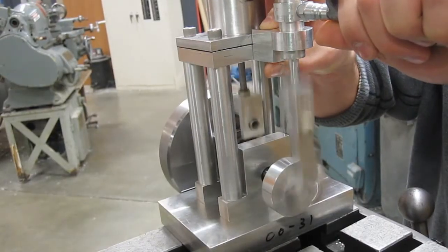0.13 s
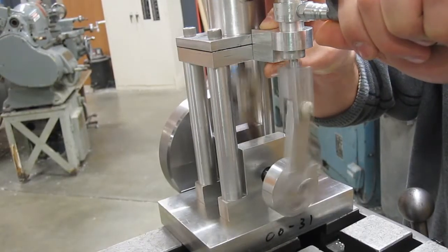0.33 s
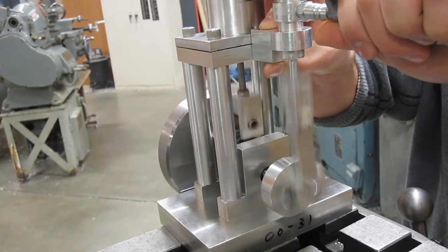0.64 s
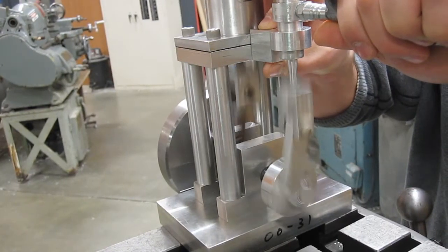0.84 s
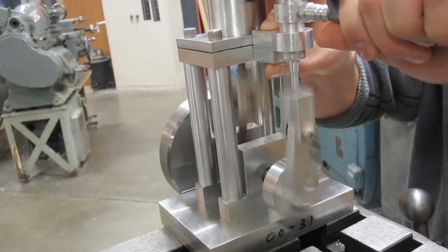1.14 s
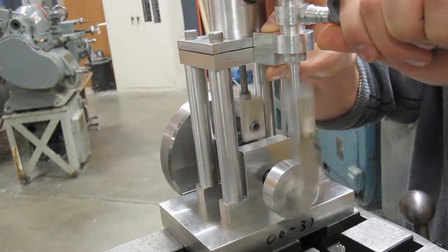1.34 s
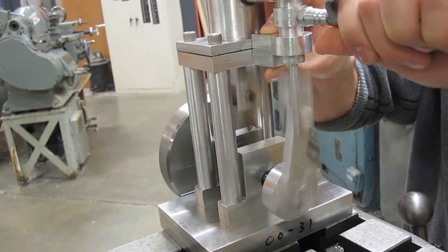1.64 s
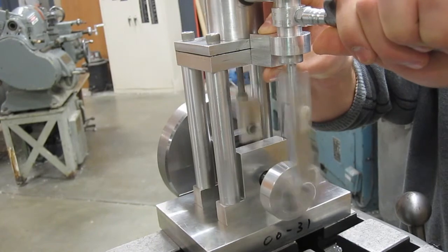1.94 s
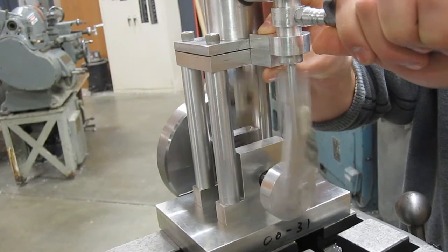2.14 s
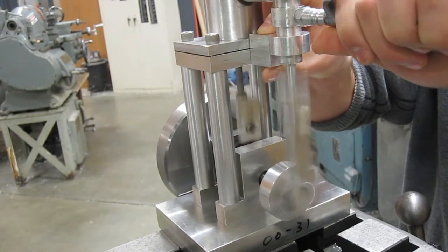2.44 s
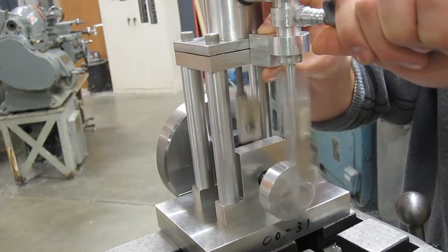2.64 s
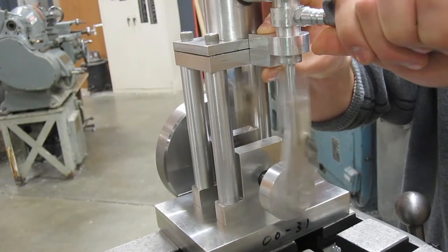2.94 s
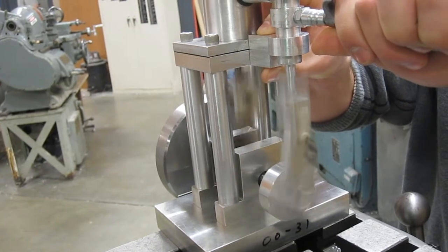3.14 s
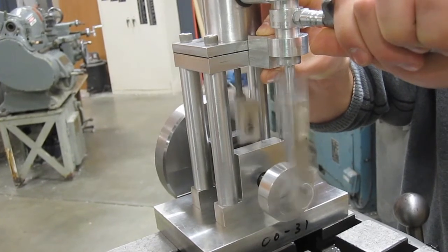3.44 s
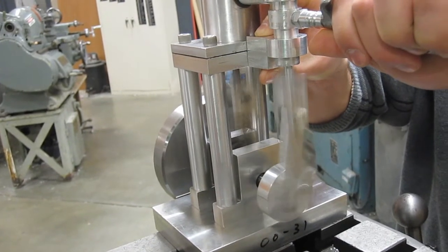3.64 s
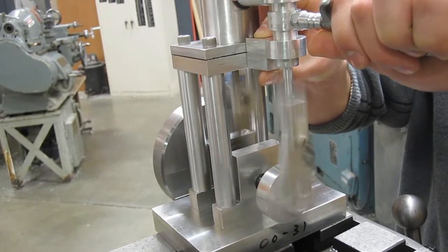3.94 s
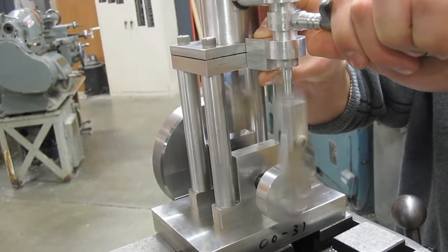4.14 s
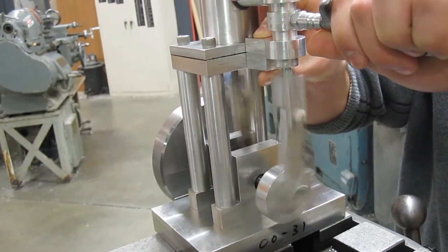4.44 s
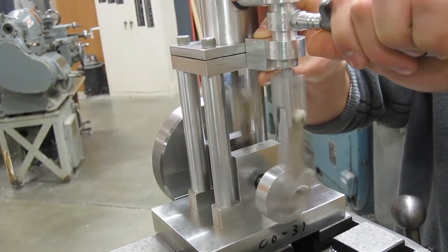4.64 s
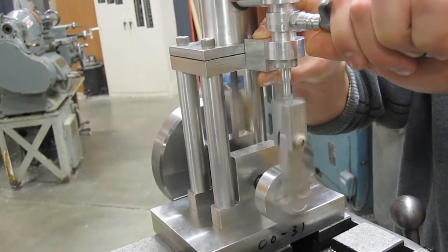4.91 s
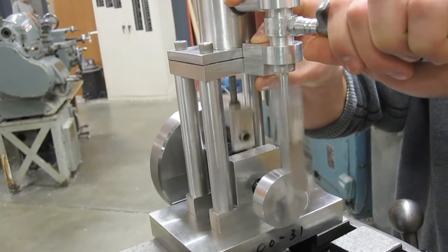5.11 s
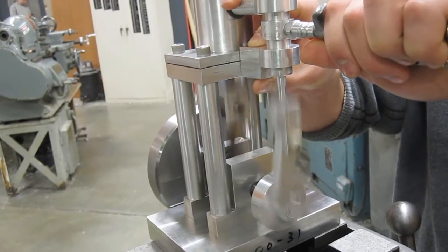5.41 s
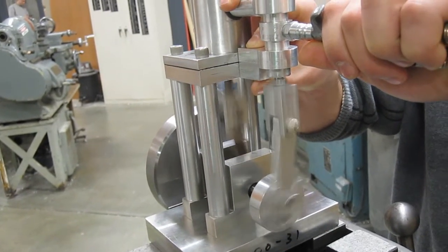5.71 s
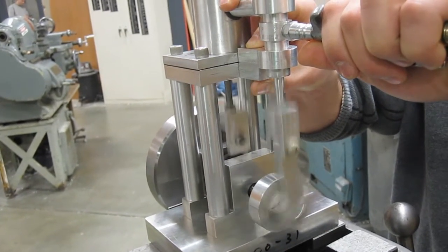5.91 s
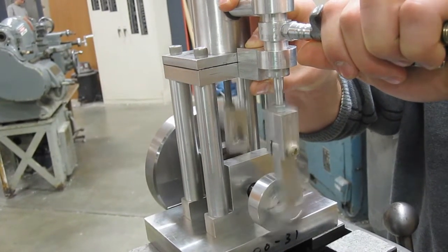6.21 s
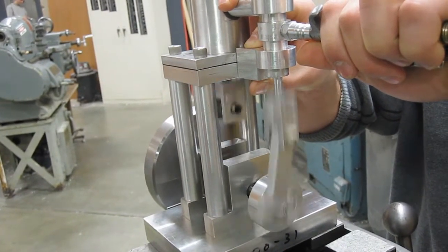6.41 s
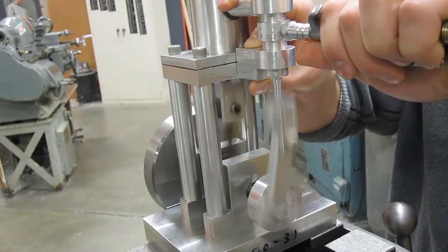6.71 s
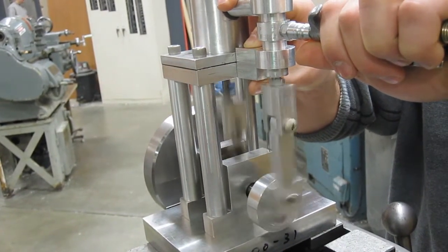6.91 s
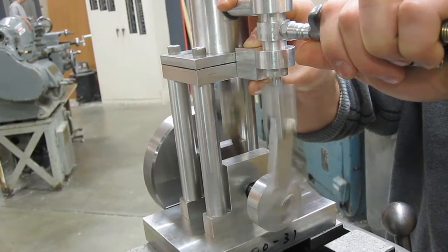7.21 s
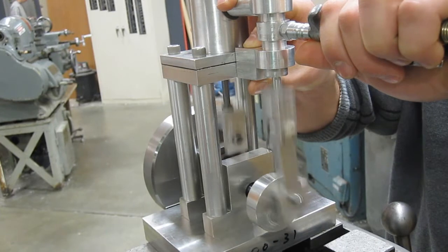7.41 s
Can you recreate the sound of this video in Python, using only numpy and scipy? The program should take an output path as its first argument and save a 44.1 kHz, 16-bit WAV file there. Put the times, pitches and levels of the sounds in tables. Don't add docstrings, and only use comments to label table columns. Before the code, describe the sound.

A small bare-metal engine runs on compressed air very close to the microphone. Bright hiss and thin whistling leak constantly while each turn gives a breathy chuff between two rattling knocks. It slows slightly, then races into a fast roaring chatter with a sharper air jet, and after about three seconds gradually slows again, with a small handle tick. Faint low workshop rumble beneath.

```python
import sys
import numpy as np
from scipy import signal
from scipy.fft import rfft, irfft, next_fast_len
from scipy.io import wavfile
from scipy.ndimage import uniform_filter1d, map_coordinates

SR = 44100
rng = np.random.default_rng(int(sys.argv[2]) if len(sys.argv) > 2 else 0)


def persist_wave(psi):
    counts = np.round(np.clip(psi, -1, 1) * 32767).astype(np.int16)
    wavfile.write(sys.argv[1], SR, np.atleast_2d(counts).T)


def gain_from_db(level_db):
    decades = np.asarray(level_db, float) / 20
    return 10 ** decades


N = 333204
TIME = np.arange(N) / SR

# (frequency [Hz], width [Hz], level [dB])
BASE_PLATE = [(805, 60, 0), (1040, 220, -5.5)]
START_TURN, TURNS = -0.989, 76
TOP_TURN = 0.515
LOOSENS_DB_PER_S = 0.64


def unit(x):
    return x / np.sqrt(np.mean(x ** 2) + 1e-20)


def noise():
    return rng.standard_normal(N)


def wobble(rate):
    return map_coordinates(rng.standard_normal(int(N * rate / SR) + 4), [TIME * rate])


def filtered(x, response):
    m = next_fast_len(N + 8192)
    return irfft(rfft(x, m) * response(np.fft.rfftfreq(m, 1 / SR)), m)[:N]


def low_cut(x, corner_hz):
    return filtered(x, lambda f: (f / corner_hz) ** 4 / (1 + (f / corner_hz) ** 4))


def modes(table):
    def response(f):
        total = 0
        for k, (centre, width, db) in enumerate(table):
            total = total + (-1) ** k * gain_from_db(db) * 1j * f * width / (centre * centre - f * f + 1j * f * width)
        return total
    return response


def hiss(spectrum):
    hz, db = np.transpose(spectrum)
    colour = lambda f: gain_from_db(np.interp(np.log(f + 1), np.log(hz), db, left=-120, right=-120))
    return unit(filtered(noise(), colour))


def gliding(centre_hz, width_hz):
    slow = [filtered(noise(), lambda f: 1 / (1 + (2 * f / width_hz) ** 2)) for _ in "xy"]
    phase = 2 * np.pi * np.cumsum(centre_hz) / SR
    return unit(slow[0] * np.cos(phase) + slow[1] * np.sin(phase))


def speed():
    # (time [s], speed [turns per s])
    flywheel = [(0.0, 8.75), (0.84, 7.24), (1.06, 7.069), (1.46, 7.621), (1.67, 8.739), (2.01, 12.403),
                (2.26, 14.07), (3.09, 17.291), (3.32, 17.487), (4.19, 12.109), (4.84, 9.398), (5.54, 7.65),
                (6.33, 6.675), (7.56, 6.141)]
    return np.interp(TIME, *np.transpose(flywheel))


def crank(delay_s=0):
    return np.interp(TIME - delay_s, TIME, START_TURN + np.cumsum(speed()) / SR)


def moments(turn):
    return np.interp(np.arange(TURNS) + turn, crank(), TIME)


def level_db(law, s=TIME):
    # (time [s], opening [0-1])
    opening = [(0, 0.15), (1.0, 0.15), (1.35, .15), (1.6, 0.12), (1.9, 0.5), (2.6, 0.85), (3.38, .95),
               (3.52, .45), (4.2, 0.26), (5, 0.16), (6.3, 0.07), (7.56, 0.08)]
    idle_per_s = 8
    coast_per_s2 = 2.6
    slowing = uniform_filter1d(-np.gradient(speed()) * SR, SR // 5).clip(0)
    coasting = np.tanh(slowing ** 2 / coast_per_s2 ** 2)
    state = law[1] * (speed() - idle_per_s)
    state = state + law[2] * np.interp(TIME, *np.transpose(opening)) + law[3] * coasting
    return law[0] + np.interp(s, TIME, state)


def stroke_db(law, s, loaded=1):
    # (time [s], level over usual [dB])
    trapped_air = [(0, 1.4), (.8, 0.38), (1.1, -1.8), (1.7, 0.16), (2.4, .3), (3.1, 2.2), (3.35, -2.8),
                   (3.6, 0.24), (4.8, 0.89), (5.15, -1.4), (5.6, 1.9), (6.4, -0.45), (7.56, 0.27)]
    luck_db = law[4] * (1 - rng.exponential(size=len(s)))
    return level_db(law, s) + loaded * np.interp(s, *np.transpose(trapped_air)) + luck_db


def filling(db):
    fill_turn, fill_width = 0.3, 0.049
    turns = crank() - fill_turn
    return gain_from_db(db * np.exp(-.5 * ((turns - np.round(turns)) / fill_width) ** 2))


def bursts(times, db, lead_s, width_s):
    marks = np.bincount(np.round((times - lead_s) * SR).astype(int).clip(0, N - 1), gain_from_db(db), N)
    t = np.arange(-1000, 1001) / SR
    return signal.fftconvolve(marks, np.exp(-.5 * (t / width_s) ** 2), "same")


def valve():
    # (frequency [Hz], level [dB per Hz])
    leak_colour = [(350, -30.5), (600, -22.5), (811, -11), (917, -20), (1440, -10), (1740, -10), (3910, -2),
                   (5000, -2.5), (7140, -1), (8650, -1), (10500, -3.5), (11900, 2), (13000, -6.5),
                   (15800, -12)]
    # (frequency [Hz], width [Hz], level [dB])
    seat = [(6880, 600, -5), (7270, 430, -.6), (9100, 280, -2.2), (10750, 1300, -3.2), (12250, 420, .4),
            (12850, 750, -3.6)]
    leak_db = level_db((-31, 0.12, -3.5, -0.37)) + 9
    whistle_db = level_db((-26.5, 0.22, -12, 0)) + 3
    hum_db = level_db((-64, 0.01, -26, 1.5)) + 1.5
    leak = gain_from_db(leak_db + 0.51 * wobble(8.2) + 0.88 * wobble(60)) * hiss(leak_colour)
    whistle = unit(filtered(noise(), lambda f: modes(seat)(f) ** 2))
    whistle = gain_from_db(whistle_db + 0.46 * wobble(14)) * whistle
    hum_hz = 35.5 + 0.26 * wobble(2.3)
    hum = gain_from_db(hum_db + 1.2 * wobble(3.1)) * np.sin(2 * np.pi * np.cumsum(hum_hz) / SR)
    return filling(db=-0.27) * (leak + whistle) + hum


def plate():
    shaking = filtered(noise(), modes([(808, 45, 0), (1050, 250, -11), (1510, 180, -2)]))
    db = level_db((-52, -0.3, 2.5, 3.5)) + LOOSENS_DB_PER_S * TIME + 3.1 * wobble(25)
    return gain_from_db(db) * filling(db=-4.5) * unit(shaking)


def shop():
    # (frequency [Hz], level [dB per Hz])
    rumble = [(13, -43), (22, -7), (365, -5), (597, -2.5), (700, -18.5), (910, -13), (1540, -120)]
    return gain_from_db(level_db((-62.5, -0.15, -3.5, 1.5)) + 0.83 * wobble(9.4)) * hiss(rumble)


def exhaust():
    # (frequency [Hz], level [dB per Hz])
    rush_colour = [(500, -24), (1000, -24.5), (2000, -3), (4000, 3), (6200, 6.5), (8000, -2), (11000, -2),
                   (15500, -28)]
    turns = crank(delay_s=0.003067) + .29
    angle = turns - np.round(turns)
    bump = lambda width: np.exp(-.5 * (angle / width) ** 2)
    is_open = 1 / (1 + ((angle + 0.081) / 0.24) ** 8)

    rush_db = level_db((-37.5, 0.3044, -2.8, 3)) + 7.5
    rush = gain_from_db(rush_db + 2.0 * wobble(40)) * is_open * hiss(rush_colour)

    chuff_db = stroke_db((-26, 0.27, -3.5, 2, 0.4), moments(-.29))
    chuff_db = chuff_db[np.round(turns).astype(int).clip(0, TURNS - 1)]
    tone = gliding(3480 + 18000 * angle ** 2, width_hz=580)
    tone = tone + gain_from_db(-10.5) * gliding(5950 + 9000 * angle ** 2, width_hz=570)
    tone = gain_from_db(chuff_db - 2.0) * bump(width=0.15) * tone
    roar = gliding(4000 + 0 * angle, width_hz=1000)
    roar = gain_from_db(-55.0 + 1.3 * speed()) * (0.96 + 0.39 * is_open) * roar

    jet = gliding(10250 + 1500 * angle ** 2, width_hz=900)
    jet = jet + gain_from_db(2.5) * gliding(12000 + 0 * angle, width_hz=2000)
    choked_db = -25
    jet_db = np.minimum(level_db((-35.5, 0.5, 19, -4)), choked_db)
    jet = gain_from_db(jet_db) * (0.31 + 0.58 * bump(width=0.1)) * jet
    return rush + gain_from_db(.7 * wobble(150)) * (tone + roar + jet)


def ring(x, table):
    response = modes(table)
    size = np.sqrt(np.mean(abs(response(np.linspace(1, SR / 2, num=4096))) ** 2))
    return filtered(x, response) / size


def knock(s, laws, spit_modes, spit_lead_s, frame_lead_s):
    # (frequency [Hz], width [Hz], level [dB])
    columns = [(1450, 570, -1.5), (2060, 330, 3.5), (2740, 880, -0.5)]
    slack_s = .0008
    s = s + slack_s * rng.standard_normal(len(s))
    base_db, frame_db, spit_db = [stroke_db(law, s, loaded) for law, loaded in zip(laws, (.4, 0, 0))]
    base_db = base_db + LOOSENS_DB_PER_S * s

    luck = rng.uniform(-1.03, 1, (len(s), 4))
    blow = bursts(s, base_db + 8.5, lead_s=0.00226, width_s=0.00026)
    touch_s, touch_db = s + 0.00214 * luck[:, 0], base_db + 3.5 + 4 * luck[:, 1]
    bounce_s, bounce_db = s + 0.00591 * luck[:, 2], base_db + 0.2 + 4 * luck[:, 3]
    blow = blow + bursts(touch_s, touch_db, lead_s=0.00407, width_s=0.000057)
    blow = blow + bursts(bounce_s, bounce_db, lead_s=-.011, width_s=0.00039)
    base = ring(blow, BASE_PLATE)

    frame = ring(bursts(s, frame_db - 0.5, frame_lead_s, width_s=0.005) * noise(), columns)
    snap = bursts(s, spit_db, spit_lead_s, width_s=0.004)
    snap = snap + bursts(s, spit_db - 3.5, spit_lead_s, width_s=0.00073)
    spit = ring(snap * noise(), spit_modes)
    return base + frame + spit


def top_knock():
    # (idle [dB], per turn a second [dB], full opening [dB], coasting [dB], scatter [dB])
    top_laws = [
        (-45, -0.18, -1.3, 3, 2.9),
        (-29, -0.43, -8, -1, 2.7),
        (-23.5, -0.3, 3, -1, 3.4),
    ]
    # (frequency [Hz], width [Hz], level [dB])
    top_spit = [(6370, 2600, -2), (11000, 880, 5.5), (14500, 990, -4)]
    lag_s = .002
    s = moments(TOP_TURN - 1) + lag_s
    return knock(s, top_laws, top_spit, spit_lead_s=0.0042, frame_lead_s=0.00052)


def bench():
    s = np.r_[moments(0), moments(TOP_TURN - 1)]
    db = stroke_db((-54, 0.37, -3, -1, 1.5), s)
    blows = bursts(s, db, lead_s=0.0016, width_s=.005) * noise()
    return gain_from_db(15) * filtered(blows, modes([(227, 100, -0.1), (430, 440, -1)]))


def bottom_knock():
    # (idle [dB], per turn a second [dB], full opening [dB], coasting [dB], scatter [dB])
    bottom_laws = [
        (-47, -0.3, -7, 2.5, 2.9),
        (-30.8, -.6, -4.5, 0.5, 2),
        (-23, -0.47, 5, -10, 2.6),
    ]
    # (frequency [Hz], width [Hz], level [dB])
    bottom_spit = [(4180, 1700, 7.5), (5870, 1000, 10), (10300, 11000, -1.5), (14100, 1600, 1)]
    lag_s = .0025
    s = moments(0) + lag_s
    return knock(s, bottom_laws, bottom_spit, spit_lead_s=0.0014, frame_lead_s=0.00023)


def thump():
    s = moments(0)
    db = stroke_db((-55, -0.15, -2.5, 1.5, 2.2), s)
    later = lambda turn: s[:-1] + turn * np.diff(s)
    s = np.r_[s, later(.465), later(.072)]
    db = np.r_[db, db[:-1] - 8.5, db[:-1] - 8]
    swing = .8 * bursts(s, db, lead_s=.003, width_s=.001) - bursts(s, db, lead_s=.0001, width_s=.0016)
    shaft_turns = uniform_filter1d(crank(), SR // 8)
    shaft = np.sin(2 * np.pi * 16 * shaft_turns)
    shaft = gain_from_db(-105 + 2.1 * speed() + 2.5 * wobble(2.5)) * shaft
    return gain_from_db(2.5) * low_cut(swing, corner_hz=50) + shaft


def slide():
    s = moments(0)
    period = np.diff(s)
    scrape = bursts(s[:-1] + 0.86 * period, -30 + 58 * period, lead_s=0, width_s=0.0069)
    return filtered(scrape * noise(), modes(BASE_PLATE))


def handle():
    # (time [s], level [dB], low tone [Hz], high tone [Hz], high tone level [dB])
    ticks = [
        (3.444, -9.5, 9340, 10100, -3),
        (4.047, -9, 8900, 11750, -2.5),
    ]
    out, t = np.zeros(N), np.arange(SR // 20) / SR
    for s, db, low_hz, high_hz, high_db in ticks:
        pair = np.sin(2 * np.pi * low_hz * t) + gain_from_db(high_db) * np.sin(2 * np.pi * high_hz * t)
        attack = 1 - np.exp(-t / 0.00066)
        out[round(s * SR):][:len(t)] += gain_from_db(db - 60 * t / 0.028) * attack * pair
    return out


def scene():
    metal = plate() + top_knock() + bottom_knock() + slide()
    metal = low_cut(metal, corner_hz=600)
    engine = valve() + exhaust() + metal + thump() + handle()
    return np.tile(engine + bench() + shop(), (2, 1))


def low_pass(x):
    return signal.sosfilt(signal.butter(12, 15950, fs=SR, output="sos"), x)


def record(dry):
    # (frequency [Hz], width [Hz], level [dB])
    echo_dips = [(1200, 130, -4), (1770, 200, -3.5), (5500, 400, -2.5), (8780, 220, -6), (9700, 300, -2.5),
                 (11750, 300, -1.5)]
    top_hz = 15750

    def response(f):
        gain = 1.0 * (f < top_hz)
        for hz, width, db in echo_dips:
            gain = gain * (1 - (1 - gain_from_db(db)) / (1 + (2 * (f - hz) / width) ** 2))
        return gain

    mic = filtered(dry[0], response)
    return low_pass(np.tile(mic, (2, 1)))


dry = scene()
out = record(dry)
persist_wave(out)
```